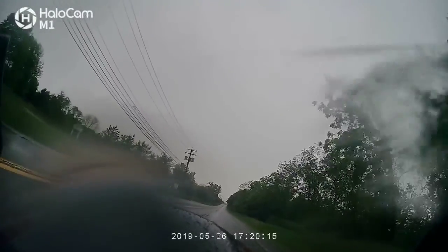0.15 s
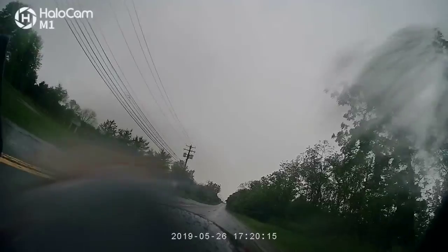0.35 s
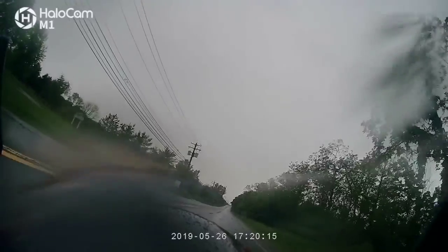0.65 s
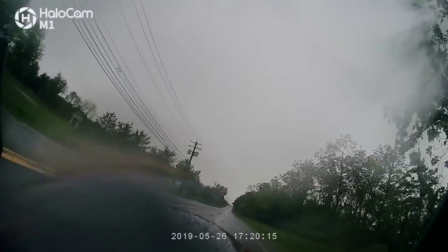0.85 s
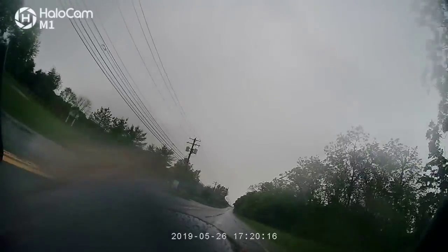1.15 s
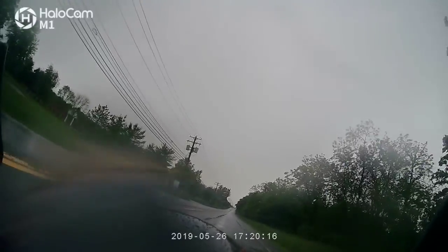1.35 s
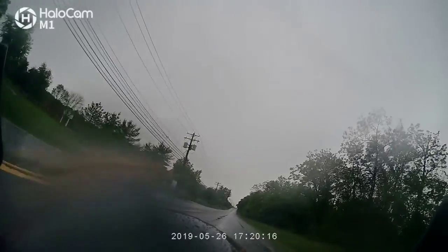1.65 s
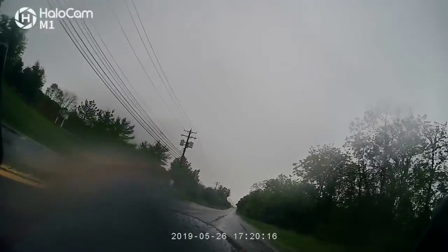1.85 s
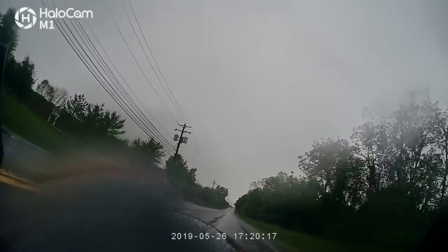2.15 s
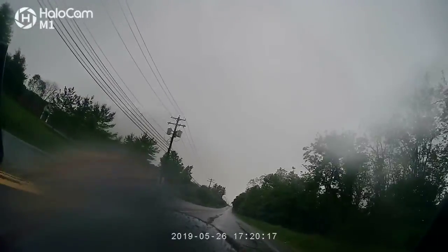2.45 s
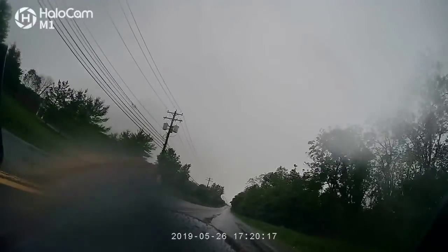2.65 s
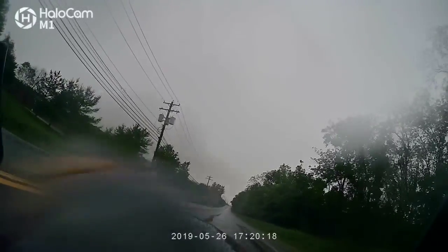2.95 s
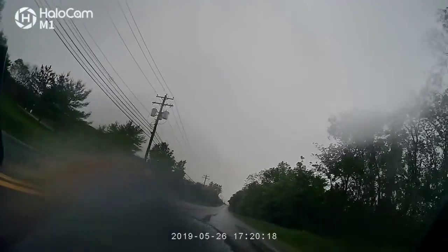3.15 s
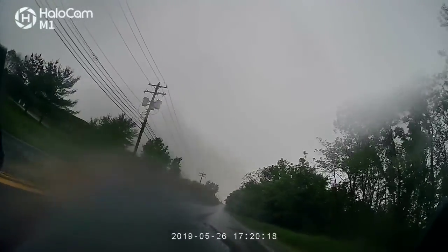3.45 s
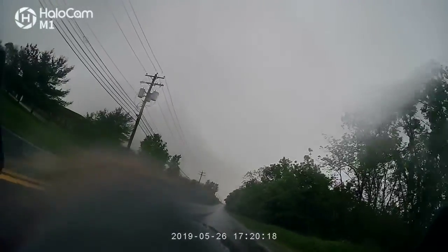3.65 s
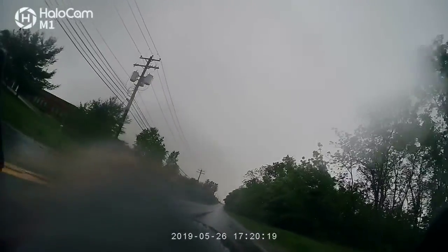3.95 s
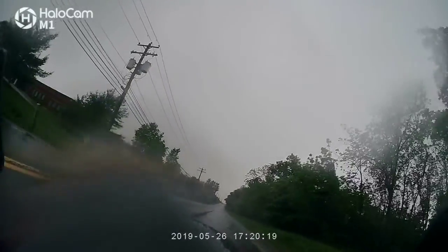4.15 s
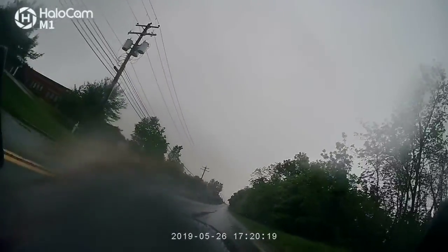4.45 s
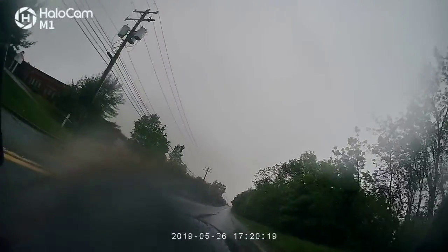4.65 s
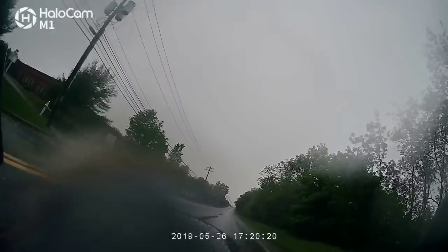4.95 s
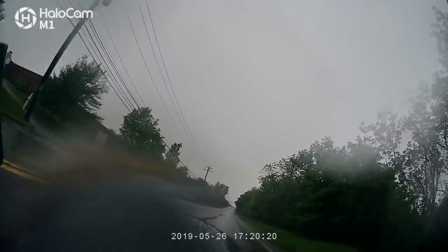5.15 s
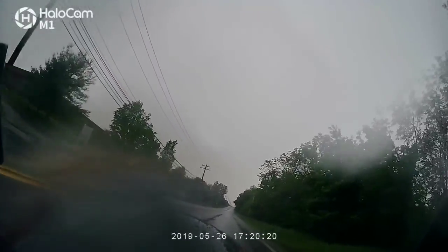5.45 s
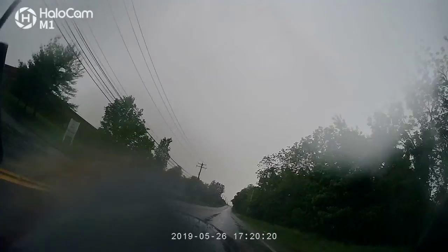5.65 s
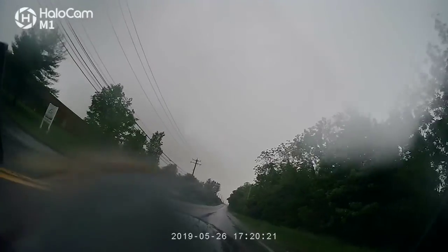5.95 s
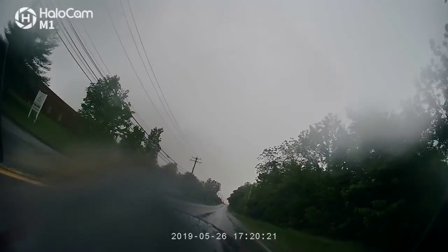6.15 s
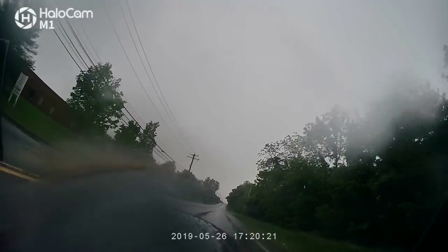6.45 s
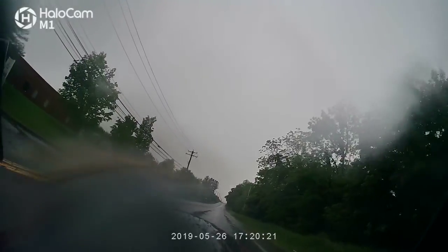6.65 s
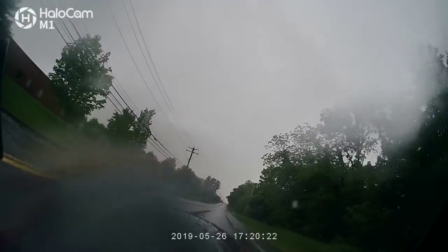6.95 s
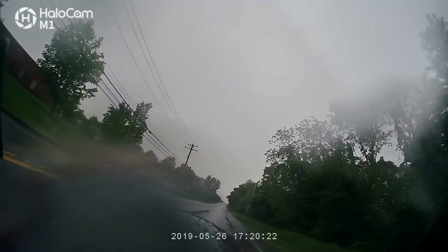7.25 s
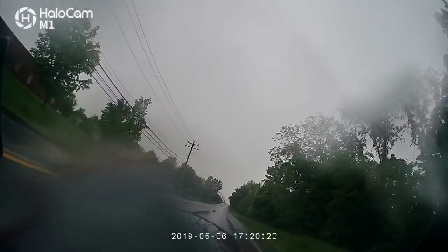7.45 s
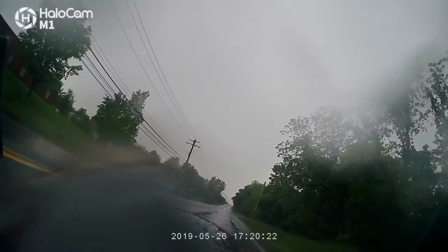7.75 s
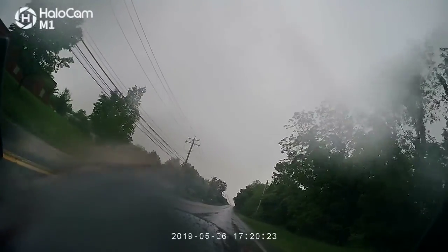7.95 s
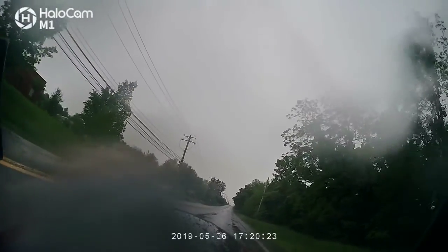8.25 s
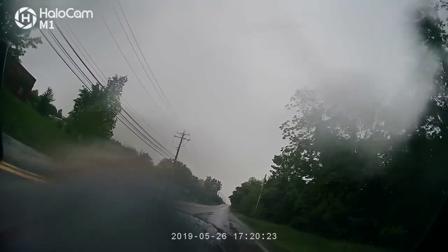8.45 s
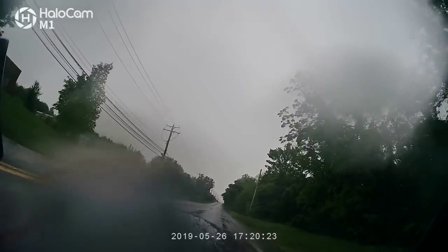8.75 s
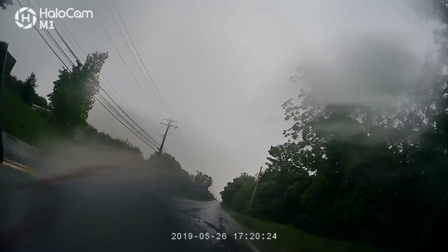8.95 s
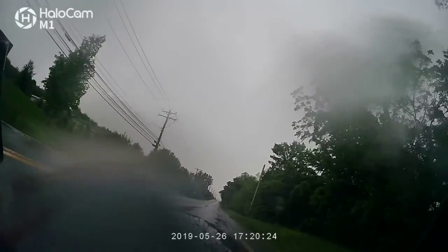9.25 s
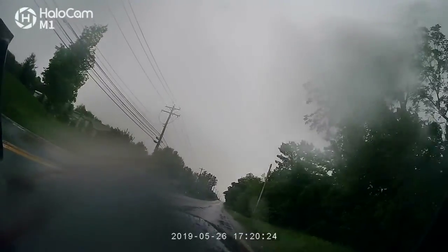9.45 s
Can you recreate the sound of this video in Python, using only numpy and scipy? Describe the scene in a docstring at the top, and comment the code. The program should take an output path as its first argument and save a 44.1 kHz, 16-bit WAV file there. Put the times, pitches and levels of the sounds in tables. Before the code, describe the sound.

A motorcycle cruises along a wet road, heard from a small microphone on the bike. A strong low exhaust surge opens, with one bright tick, then settles into a throbbing drone with metallic ticking. Road roar, spray hiss and wind bumps surround it. The revs rise slightly midway, then sag and quieten at the end.

```python
"""An exhaust drone surges over hissing wet road: a motorcycle cruises, heard by a small camera on the bike. The
drone is a sum of sines on multiples of the engine cycle, some singing out for a while. Roar and spray are
patchy noise, swelled by exhaust puffs and coloured by housing resonances. Valve ticks ring in the engine cover,
gear whine follows the revs, wind buffets the microphone port, and low thuds come and go. Once the sound skips
ahead, with a bright tick."""
import sys
import numpy as np
from scipy import signal
from scipy.io import wavfile
from scipy.ndimage import uniform_filter1d

SR = 44100
rng = np.random.default_rng(int(sys.argv[2]) if len(sys.argv) > 2 else 0)


def output_pcm(signal):
    """Save a mono or channel-first signal as 16-bit PCM at the path in sys.argv[1].

    Samples are clipped to [-1, 1] before scaling.
    """
    pcm = np.clip(np.atleast_2d(signal).T, -1, 1) * 32767
    wavfile.write(sys.argv[1], SR, np.round(pcm).astype(np.int16))


N = 422919

START_TURN = .62  # share of the cycle already gone at the start
SKIP_S, SKIP_TURN, SKIP_STEP = .372, .45, -.12  # moment of the skip, cycles jumped, height of the step
SURGE_END_S = 1.25
SHUT_S, SHUT_DB = 8.95, 8.5  # the throttle closes: drop of orders 7 and 8, the ticks half as far
FADE_S = .033  # edges of the whine and of the throttle closing


def from_db(db):
    """Decibels to gain."""
    return 10 ** (np.asarray(db) / 20)


def rms_one(x):
    """Scale to rms 1."""
    return x / np.sqrt(np.mean(x ** 2) + 1e-20)


def in_time(rows):
    """Columns of a curve table after the first (seconds), one value per sample."""
    s, *columns = np.transpose(rows)
    return [np.interp(np.arange(N) / SR, s, column) for column in columns]


def drift(rate_hz):
    """Slow chance: noise through two equal one-pole low-passes, scaled to rms 1."""
    # made at one point per 40 samples, after a run-in of 2000 points
    r = np.exp(-80 * np.pi * rate_hz / SR)
    noise = rng.standard_normal(N // 40 + 2002)
    slow = signal.lfilter([1], [1, -2 * r, r * r], noise)[2000:]
    return np.interp(np.arange(N) / 40, np.arange(len(slow)), rms_one(slow))


def swell(start, length, fade):
    """0 to 1 and back, in seconds: rise, hold, fall."""
    since = np.arange(N) / SR - start
    to_nearest_end = np.minimum(since, length - since)
    return np.sin(np.pi / 2 * np.clip(to_nearest_end / fade, 0, 1)) ** 2


def surge():
    """1 during the opening surge, then 0."""
    return swell(-1, SURGE_END_S + 1, .3)


def tones(turns, orders, group_db, waver, scatter, span=slice(None), beat=0):
    """Sines on multiples of the cycle, wavering in level and phase through uneven burning."""
    # scatter 0 lines up the peaks in one pulse; beat (share of a cycle) delays that pulse
    out = 0
    for k, order_db in orders:
        level_db = group_db + order_db + 7 * waver * drift(1.5)[span]
        cycles = round(k) * turns[span] - (k - 4) * beat + scatter * rng.random()
        phase = 2 * np.pi * cycles + waver * drift(1.5)[span]
        out = out + np.sqrt(2) * from_db(level_db) * np.cos(phase)
    return out


def housing(x, more_db):
    """The shell around the microphone lifts narrow bands, which wander as it shakes on its mount."""
    # Each row: resonance in Hz, width in Hz, lift in dB before more_db.
    resonances = [(234.7, 20, 5), (357, 57, 2), (413, 34, -6.5), (512, 7.4, -11.5), (794, 45, 2),
                  (1497, 140, 4), (1990, 270, 2.5), (2611, 99, 5)]
    out = x.copy()
    for hz, width, lift_db in resonances:
        r = np.exp(-np.pi * width / SR)
        band = signal.lfilter([(1 - r * r) / 2, 0, (r * r - 1) / 2],
                              [1, -2 * r * np.cos(2 * np.pi * hz / SR), r * r], x)
        out += from_db(lift_db + more_db + .14 * drift(.84)) * band
    return out


def strong_order_levels(cycles_per_s, shut_db):
    """Levels in dB of orders 4 to 8; the revs move 7 and 8 along the response of the pipe."""
    # Drone curve. Each row: time in seconds, order 4 level in dB, order 5 level in dB.
    drone = [(0, -65, -39.5), (.12, -40, -41.5), (.15, -31, -22.5), (.8, -24, -26.5), (1.13, -24, -31),
             (1.3, -26, -43), (2.7, -32.5, -44), (3.2, -36.5, -48), (3.5, -35.5, -43.5), (3.8, -33, -36),
             (4.1, -26.5, -33.5), (4.7, -31.5, -36), (5, -35.5, -42), (5.9, -29.5, -48), (6.3, -25, -54),
             (7.1, -26, -46), (7.45, -31.5, -45.5), (7.65, -48.5, -48), (8.3, -34, -42.5),
             (8.55, -43.5, -41), (9.59, -46, -42)]
    # Exhaust pipe response. Each row: frequency in Hz, level in dB.
    pipe = [(120, -30.5), (135, -39), (144, -37.5), (149, -44), (158, -43.5), (163, -59), (167, -42.5),
            (172, -44), (186, -47.5)]
    fourth_db, fifth_db = in_time(drone)
    sixth_db = -32.5 + .32 * fifth_db
    seventh_db, eighth_db = [np.interp(k * cycles_per_s, *np.transpose(pipe)) - shut_db for k in (7, 8)]
    eighth_db = eighth_db + .3 * (fifth_db - fifth_db.mean())  # shares some of order 5's swing
    return [fourth_db, fifth_db, sixth_db, seventh_db, eighth_db]


def exhaust(turns, cycles_per_s, swing_db, shut_db):
    """Clean strong orders throb against each other; weaker upper ones waver and colour the shell."""
    # Steady lowest order. Each row: multiple of the cycle, level in dB.
    low_orders = [(1, -39)]
    # Upper orders. Each row: multiple of the cycle, level in dB relative to the group.
    upper_orders = [(35, -10), (36, -11.5), (37, -17.5), (38, -11)]
    # where in the cycle the strong orders peak together, as a share of it
    cruise_beat, surge_beat = .52, .93
    in_surge = surge()
    strong_db = strong_order_levels(cycles_per_s, shut_db)
    strong = tones(turns, zip(range(4, 9), strong_db), 0, waver=.052, scatter=.12 - .048 * in_surge,
                   beat=cruise_beat + (surge_beat - cruise_beat) * in_surge)
    lowest = tones(turns, low_orders, 0, waver=.25, scatter=.15)
    # upper orders harden while the revs climb: 3.5 dB per cycle/s gained each second
    climb = uniform_filter1d(np.gradient(cycles_per_s) * SR, size=SR // 4)
    upper_db = -45.5 + .81 * swing_db + 3.5 * np.clip(climb, 0, 2)
    upper = tones(turns, upper_orders, upper_db, waver=.3, scatter=1)
    return strong + lowest + housing(upper, more_db=3)


def strokes(turns):
    """Samples of the four strokes of each cycle and the level in dB of each."""
    # Four strokes, each waxing and waning. Each row: time in seconds, then the level in dB
    # of the first, second, third and fourth stroke.
    pattern = [(0, 3, -9, -1, -4), (1.5, 0.5, -10, -4, -3), (2.5, 2.5, -14, 3.5, 3), (4, 2, -11, 5.5, 1),
               (4.9, 3.5, -10, 3, -5.5), (5.5, -3, -10, -5.5, -2.5), (6.4, -2.5, -9, -3.5, -1),
               (6.9, 1, -9.5, 0.5, 8.5), (7.8, 0, -5.5, -3, 4), (8.2, 0.5, -7, -4.5, -4.5)]
    first_stroke = .13  # share of the cycle
    quarter = np.floor(4 * (turns - first_stroke)).astype(int)
    at = np.flatnonzero(np.diff(quarter)) + 1
    return at, np.array(in_time(pattern))[quarter[at] % 4, at]


def puffs(turns, depth, decay_s):
    """Four uneven exhaust pulses a cycle each lift the noise sharply and die away."""
    at, pattern_db = strokes(turns)
    kicks = np.zeros(N)
    kicks[at] = from_db(.83 * pattern_db + rng.normal(0, 1.7, len(at)))
    pulses = signal.lfilter([1], [1, -np.exp(-1 / (decay_s * SR))], kicks)
    # one throb a cycle, deeper in the opening surge
    throb = (.05 + .15 * surge()) * np.cos(2 * np.pi * turns)
    return rms_one(1 + depth * pulses + throb)


def patchy_noise(spectrum, patchy_db):
    """Third-octave bands of noise, each with its own level and flicker."""
    out, together = 0, drift(3)
    edges = 50 * 2 ** np.arange(0, 6.5, 1 / 3)
    white = rng.standard_normal((2, N))  # neighbouring bands take different noise
    at, level_db = np.transpose(spectrum)
    for k, (low, high) in enumerate(zip(edges, edges[1:])):
        band_pass = signal.butter(2, [low, high], "band", fs=SR, output="sos")
        band = signal.sosfilt(band_pass, white[k % 2])
        colour_db = np.interp(np.log(low * high) / 2, np.log(at), level_db, left=-60, right=-60)
        out = out + band * from_db(colour_db + patchy_db * (.31 * together + drift(13)))
    return out


def road_roar(roar_db, puff):
    """Low broad noise, pumped by the exhaust puffs and coloured by the shell."""
    # Broad colour. Each row: frequency in Hz, relative density in dB per Hz.
    colour = [(60, 0.5), (100, 2.5), (150, -1), (200, -13.5), (250, -4.5), (300, -8.5), (420, -3),
              (650, -3.5), (950, -3), (1200, -16), (1700, -26)]
    noise = housing(patchy_noise(colour, patchy_db=.85), more_db=-3)
    return from_db(roar_db) * puff * rms_one(noise)


def spray_and_rain(spray_db, puff):
    """Higher hiss through the shell, pumped less by the puffs than the roar."""
    # Broad colour. Each row: frequency in Hz, relative density in dB per Hz.
    colour = [(700, -17.5), (1100, -4), (1400, -4), (1750, -4), (2100, -6), (2400, -3.5), (3000, -7),
              (3400, 0), (3800, -18.5)]
    noise = housing(patchy_noise(colour, patchy_db=1.5), more_db=-.5)
    return from_db(spray_db) * (.73 + .35 * puff) * rms_one(noise)


def buffeting(swing_db):
    """Lumpy low noise from wind on the microphone port, lifted by short gusts."""
    # Gusts. Each row: start in seconds, lift in dB over the steady buffeting.
    gusts = [(.3, 5), (.7, 13), (1.2, 0), (3.1, 4), (3.7, 0), (5.55, 7), (5.7, 12), (6.3, 7), (6.5, 9),
             (6.9, 6), (7.6, 6), (7.75, 5.5), (7.1, 6), (7.4, 9), (8.15, 5.5), (8.5, 12), (8.75, 6),
             (9.1, 1), (9.27, 4.5)]
    gust_s = .17
    gust_db = sum(db * swell(s, gust_s, gust_s / 2) for s, db in gusts)
    level_db = -33.5 + .14 * swing_db + gust_db
    low = signal.sosfilt(signal.butter(1, [5, 40], "band", fs=SR, output="sos"), rng.standard_normal(N))
    low = signal.sosfilt(signal.butter(2, 65, fs=SR, output="sos"), low)
    return from_db(level_db) * rms_one(low * from_db(1.5 * drift(9.8)))


def ring(clicks, hz, t60):
    """A unit click sets a decaying sine ringing, of height 1 before decay; t60 in seconds."""
    r, w = 1000 ** (-1 / (t60 * SR)), 2 * np.pi * hz / SR
    return signal.lfilter([0, np.sin(w)], [1, -2 * r * np.cos(w), r * r], clicks + 1e-18)


def valve_gear(turns, swing_db, shut_db):
    """Four uneven ticks a cycle, plus louder knocks, all ringing in the engine cover."""
    # Louder knocks. Each row: time in seconds, click level in dB before its random spread.
    knocks = [(1.1356, -39), (1.7342, -21.5), (1.794, -23), (1.9034, -25), (2.072, -22), (3.3677, -24.5),
              (3.8342, -26), (3.876, -20.5), (3.9809, -25), (4.0043, -18), (4.1011, -17), (4.1245, -23),
              (4.1842, -19), (4.2203, -23), (4.2682, -25), (4.3156, -22), (4.386, -22), (4.642, -23),
              (4.6892, -28), (4.7571, -23), (5.8386, -21), (6.7456, -34), (7.426, -26), (9.4489, -32),
              (9.5013, -30)]
    # Cover modes. Each row: frequency in Hz, level in dB, ring time t60 in seconds.
    cover = [(780, -5, .025), (1560, 0, .022), (1960, -11, .015), (2620, -10, .02)]
    rise_s, rise_db = .92, 11  # the ticks come up over the first second
    still_to_rise = np.clip(1 - (np.arange(N) / SR / rise_s) ** 4, 0, 1)
    tick_db = -42 + 2 * swing_db - shut_db / 2 - rise_db * still_to_rise
    at, pattern_db = strokes(turns)
    jitter = (.0006 * SR * rng.standard_normal(len(at))).astype(int)
    at = np.clip(at + jitter, 0, N - 1)
    knock_s, knock_db = np.transpose(knocks)
    out = np.zeros(N)
    for hz, mode_db, t60 in cover:
        clicks = np.zeros(N)
        sign = np.where(rng.random(len(at)) < .25, 1, -1)  # most push the same way
        clicks[at] = sign * from_db(tick_db[at] + pattern_db + 8 + rng.normal(0, 2.2, len(at)))
        clicks[(knock_s * SR).astype(int)] = -from_db(knock_db + rng.normal(0, 2, len(knock_s)))
        # the broad peak softens the onset of the ring
        softened = signal.lfilter(*signal.iirpeak(hz, 2.5, fs=SR), ring(clicks, hz, t60))
        out += from_db(mode_db) * softened
    return out


def singing(turns):
    """Single orders swell out of the roar, hold and sink back, roughened by uneven burning."""
    # Each row: multiple of the cycle, start in seconds, length in seconds, level in dB.
    sung_orders = [(3, .01, 4.4, -42), (3, 6.65, 1.7, -42), (9, 1.75, 3.5, -54), (9, 8.05, .9, -53),
                   (11, .15, 1.3, -53), (11, 3.55, 1.3, -54), (11, 4.65, 2, -48), (11, 6.85, .6, -43),
                   (11, 7.5, .7, -47), (11, 8.3, .7, -51), (12, .01, 2.4, -47), (12, 2.35, 3.1, -51),
                   (12, 6.15, 2.4, -48), (12, 8.3, .62, -40), (12, 8.75, .84, -47), (13, .01, 1.7, -48),
                   (13, 1.65, 2.6, -48), (13, 4.95, 3.1, -53), (13, 8.35, .6, -50), (15, 2.15, 4.1, -54),
                   (16, .1, .95, -44), (16, .95, 2.8, -42), (16, 3.65, 1.5, -41), (16, 5.15, 1.6, -48),
                   (16, 6.95, .85, -44), (16, 7.6, .8, -48), (17, .15, 1, -46), (17, 2.25, 2.1, -48),
                   (17, 4.85, 3, -48), (18, 2.25, 1.3, -51), (18, 4.15, 1.15, -41), (19, 4.05, 3, -48),
                   (20, .45, 1.1, -50), (20, 1.65, 2.3, -50), (20, 4.05, .8, -45), (20, 5.45, .9, -44),
                   (20, 6.65, .8, -48), (21, 4.55, 1.5, -51), (23, 3.55, .7, -48), (23, 4.1, 1.1, -44),
                   (23, 7.05, .9, -51), (24, .55, .9, -45), (24, 3.55, 1.6, -47), (24, 5.75, 1.4, -46),
                   (25, 1.05, 2.6, -45), (25, 3.65, 1.3, -45), (25, 6.55, 1.1, -50), (26, 3.45, 1.8, -51),
                   (27, .35, .8, -44), (28, .25, 2.3, -53), (28, 3.65, .6, -44), (28, 6.5, 1.3, -47),
                   (28, 7.6, .7, -51), (32, 1.65, 1.1, -49), (32, 3.55, .6, -45), (33, 1.55, 2, -49),
                   (17, 7.8, 1.79, -49), (18, 1.3, 1, -50), (18, 7.4, 2.19, -50), (19, 2.3, 1.8, -50),
                   (19, 7.3, 2, -52), (21, 2.3, 1.2, -49), (21, 7.3, 1.2, -51), (22, 3.5, 1.2, -49),
                   (23, .3, 1.2, -50), (29, 2.3, 1.1, -51), (29, 4.2, 1.1, -52), (32, 2.6, 1, -50),
                   (34, 4.3, 1, -50)]
    fade_s, flutter_db = .2, 2.2
    out = np.zeros(N)
    flutter = [drift(8) for _ in range(6)]
    offset = rng.random(40)  # each order keeps its own place in the cycle
    for k, start, length, db in sung_orders:
        span = slice(max(int(start * SR), 0), int((start + length) * SR))
        tone = tones(turns + offset[k], [(k, db)], 0, waver=.15, scatter=0, span=span)
        rough = from_db(flutter_db * flutter[rng.integers(6)][span])
        out[span] += tone * swell(start, length, fade_s)[span] * rough
    return out


def whine(turns):
    """A rough gear-mesh tone at 84 times the cycle follows the revs in brief spells."""
    # Each row: start in seconds, length in seconds, level in dB.
    spells = [(.05, .36, -39), (.38, .34, -43), (7.5, .8, -52), (8.26, .24, -41)]
    level = sum(from_db(db) * swell(s, length, FADE_S) for s, length, db in spells)
    phase = 2 * np.pi * 84 * turns + 1.1 * drift(20) + .5 * drift(60)
    return level * from_db(2 * drift(25)) * np.sin(phase)


def thuds():
    """Short low sines that swell and fade."""
    # Each row: start in seconds, pitch in Hz, peak level in dB, length in seconds.
    low_thuds = [(0.928, 131, -24.5, 0.23), (7.795, 90.2, -30, .17), (8.965, 74.2, -23.5, 0.1),
                 (9.215, 126.6, -35, 0.14), (9.483, 127.7, -23, 0.09)]
    t = np.arange(N) / SR
    return sum(from_db(db) * swell(s, length, length / 2) * np.sin(2 * np.pi * hz * t)
               for s, hz, db, length in low_thuds)


def scene():
    """Engine, road and weather at one microphone, all tied to the revs and the roar's swing."""
    # Engine speed. Each row: time in seconds, speed in engine cycles per second.
    revs = [(0, 23.2), (.5, 22.19), (.9, 21.39), (1.3, 20.83), (2.5, 20.57), (3.5, 20.22), (3.9, 20.55),
            (4.3, 21.17), (4.7, 21.66), (5.1, 21.85), (5.8, 21.62), (6.15, 21.18), (6.5, 21.19),
            (7.1, 20.59), (8.33, 18.7), (8.9, 19.79), (8.97, 18.38), (9.28, 17.9), (9.59, 18.2)]
    # Broad noise. Each row: time in seconds, roar level in dB, spray level in dB.
    ride = [(0, -32, -39), (.5, -32, -38.5), (.8, -30, -37.5), (1.8, -30, -39), (2.3, -32.5, -39),
            (2.7, -32.5, -39), (3.4, -32.5, -40.5), (4, -30, -38), (4.6, -31, -37), (5.5, -31.5, -39),
            (5.9, -30, -37.5), (6.4, -31, -37), (7.1, -32, -39.5), (7.5, -33.5, -42), (8.3, -34.5, -43),
            (8.5, -33, -42), (9, -33.5, -42), (9.25, -36, -44), (9.59, -37.5, -46)]
    cycles_per_s, = in_time(revs)
    roar_db, spray_db = in_time(ride)
    swing_db = roar_db - roar_db.mean()
    shut_db = SHUT_DB * swell(SHUT_S, N / SR, FADE_S)
    skipped = SKIP_TURN * (np.arange(N) >= SKIP_S * SR)
    turns = START_TURN + np.cumsum(cycles_per_s) / SR + skipped
    puff = puffs(turns, depth=1.1, decay_s=.004)
    engine = exhaust(turns, cycles_per_s, swing_db, shut_db) + singing(turns)
    engine = engine + valve_gear(turns, swing_db, shut_db) + whine(turns)
    road = road_roar(roar_db, puff) + spray_and_rain(spray_db, puff)
    return (engine + road + buffeting(swing_db) + thuds())[None]


def record(dry):
    """A narrow-band recorder dulls the treble; the skip adds a decaying step, heard as a bright tick."""
    dull = signal.sosfilt(signal.butter(6, 3780, fs=SR, output="sos"), dry)
    narrow = signal.sosfilt(signal.cheby2(8, 50, 4700, fs=SR, output="sos"), dull)
    since = np.arange(N) / SR - SKIP_S
    tick = SKIP_STEP * (since >= 0) * np.exp(-np.abs(since) / .002)
    # the tick escapes the dulling and meets only this upper limit
    return signal.sosfilt(signal.cheby2(12, 60, 15700, fs=SR, output="sos"), narrow + tick)


dry = scene()
out = record(dry)
output_pcm(out)
```